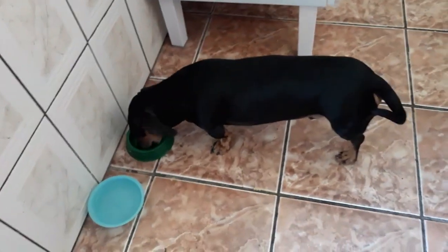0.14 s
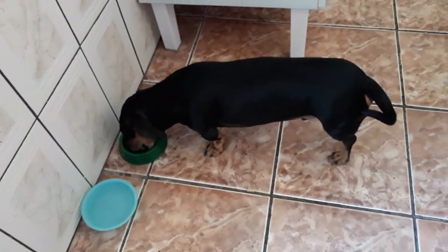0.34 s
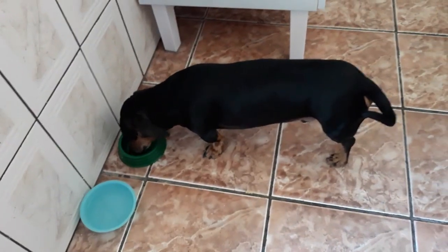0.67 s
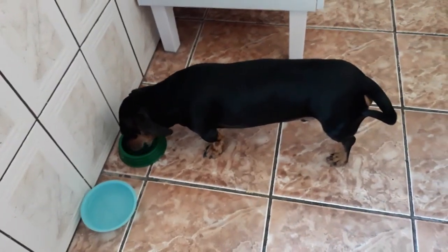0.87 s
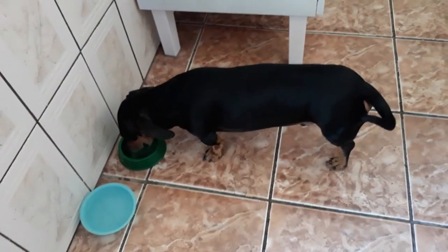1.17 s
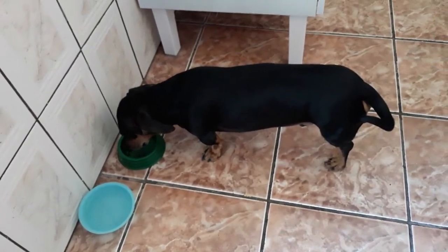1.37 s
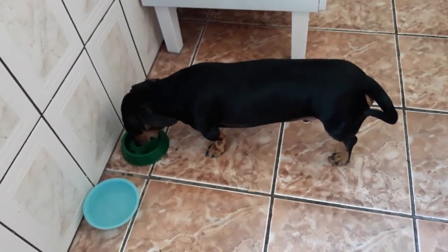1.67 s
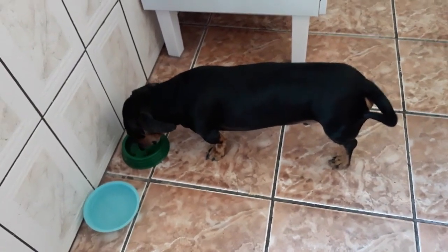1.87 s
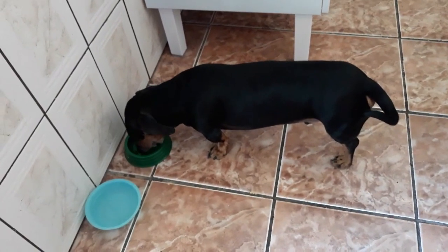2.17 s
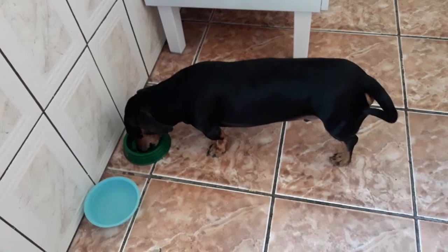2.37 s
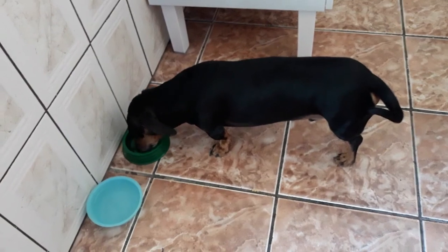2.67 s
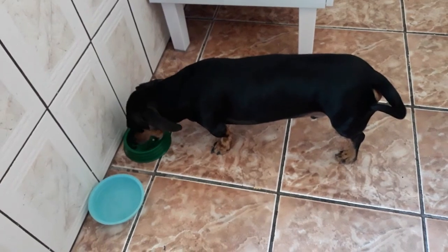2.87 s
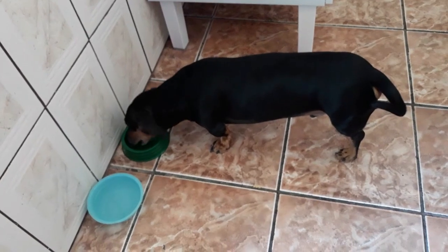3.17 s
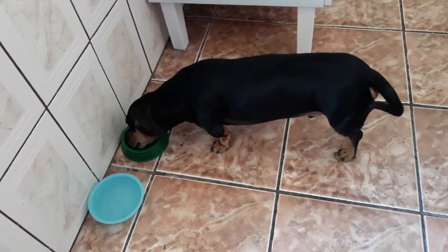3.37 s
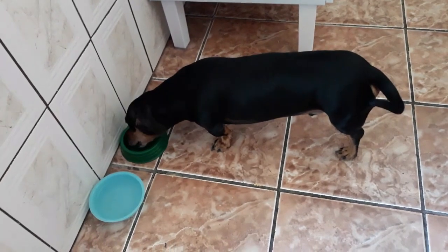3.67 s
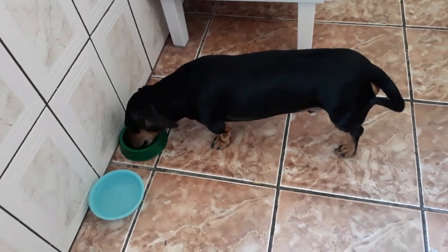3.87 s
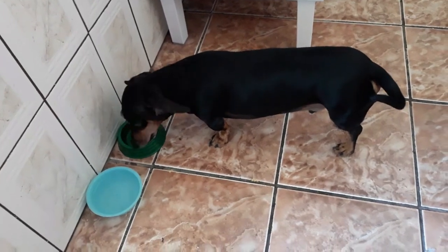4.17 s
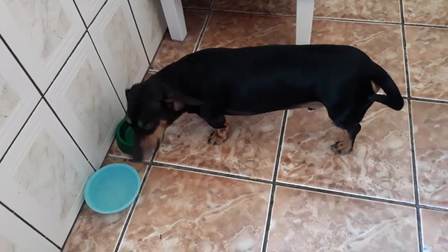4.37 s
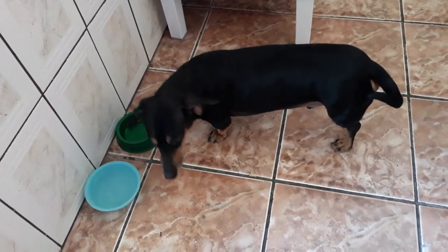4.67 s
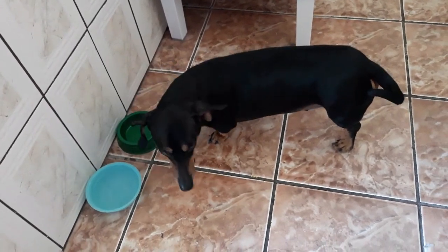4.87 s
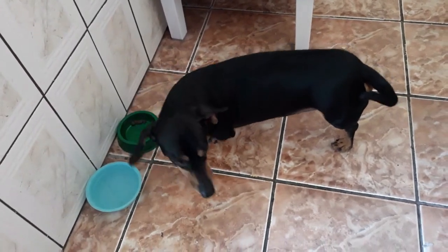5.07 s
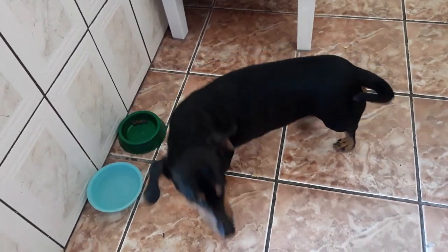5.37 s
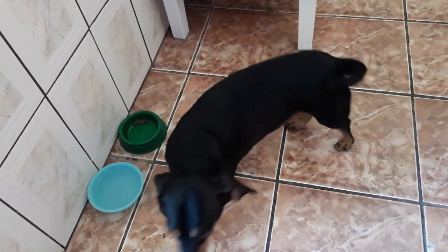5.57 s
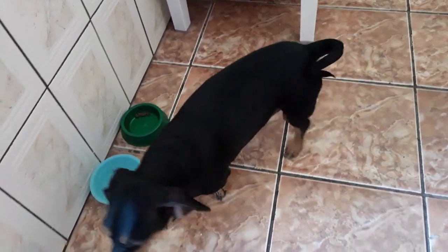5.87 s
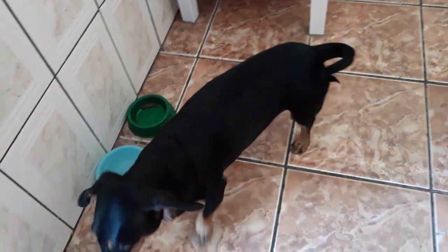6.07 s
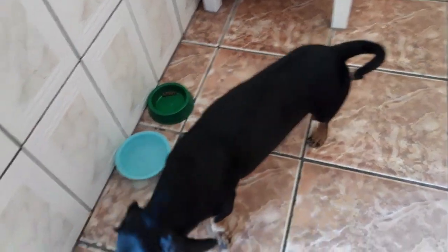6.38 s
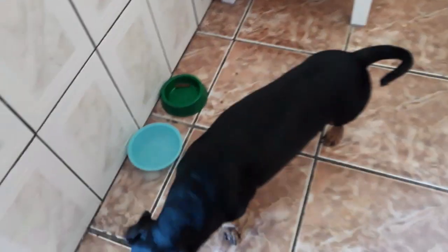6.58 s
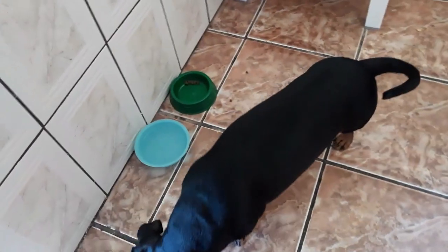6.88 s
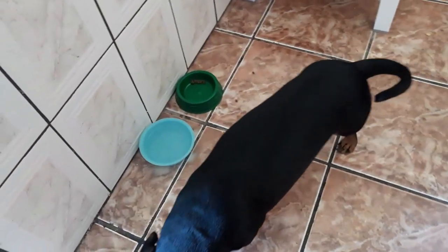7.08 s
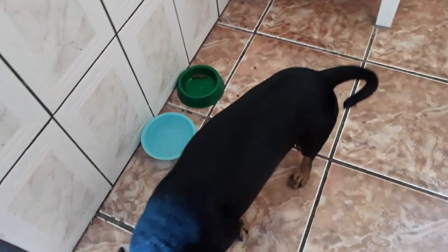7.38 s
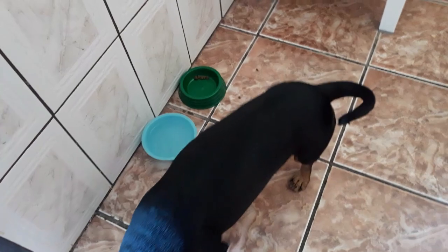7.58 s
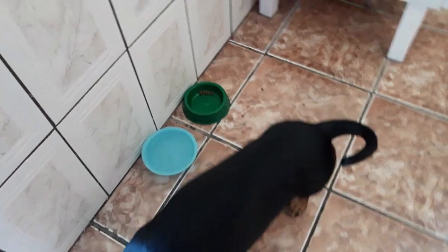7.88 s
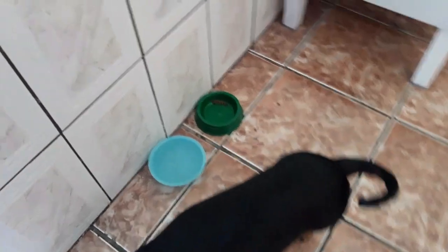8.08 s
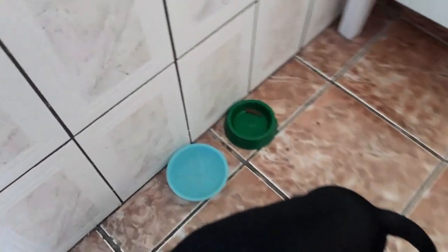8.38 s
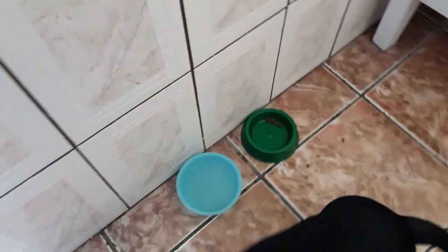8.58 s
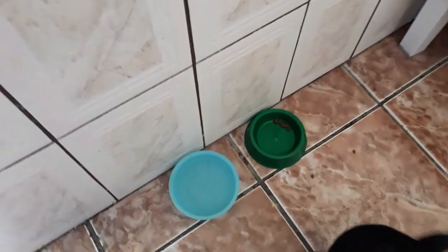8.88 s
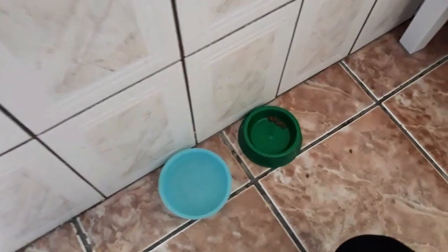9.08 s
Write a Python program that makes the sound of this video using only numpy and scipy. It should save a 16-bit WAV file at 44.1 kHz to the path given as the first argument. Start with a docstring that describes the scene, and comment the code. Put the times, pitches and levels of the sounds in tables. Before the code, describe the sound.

Hollow bowl knocks and crisp kibble and claw clicks over continuous bright running water and a low hum in an echoing tiled room.

```python
"""In a hard tiled room a small dog noses dry food around a plastic bowl.
Bowl and dishes knock as noise bursts through tuned resonances; kibble and claws click the same way, higher up.
Water splashes steadily nearby, built from thousands of bursting bubbles and a fine spray of noise.
An appliance hums low under soft room air. The tiles echo knocks, clicks and bubbles; one phone microphone hears all.
"""
import sys
import numpy as np
from scipy import signal
from scipy.fft import rfft, irfft, next_fast_len
from scipy.io import wavfile
from scipy.ndimage import uniform_filter1d, map_coordinates

SR = 44100
rng = np.random.default_rng(int(sys.argv[2]) if len(sys.argv) > 2 else 0)


def store_pcm(level_fs):
    """Save levels as 16-bit WAV."""
    pcm = np.round(np.clip(level_fs, -1, 1) * 32767).astype(np.int16)
    wavfile.write(sys.argv[1], SR, np.atleast_2d(pcm).T)


N = 407484

# samples that one blow lasts, and the frequency grid of its spectrum
SPAN = 16384
BLOW_HZ = np.fft.rfftfreq(2 * SPAN, 1 / SR)

# Knocks of bowl and dishes; the tone levels are relative to the wall of the bowl:
# start_s, peak_db (between 550 and 1100 Hz), thump_db, body_db, rim_db,
# body_ring_hz, wall_ring_hz, rim_ring_hz, t60_s (before a small fixed extension)
KNOCKS = [(0.12, -35.5, -9, -20, -9, 415, 747, 1800, 0.16),
          (0.215, -30, -23, -12.5, -12.5, 440, 795, 1530, .35),
          (0.397, -35, -4, -17, -10, 550, 990, 1770, 0.31),
          (0.445, -21.5, 13.5, -5.5, 0, 533, 720, 2360, 0.49),
          (0.459, -26.5, 8, -12, 5.5, 504, 735, 1311, 0.8), (0.684, -32.5, 2, -4.5, -14, 423, 770, 1630, 1),
          (0.93, -32, 5, 5, -15, 420, 643, 1530, 0.37), (0.954, -28.5, 0, -10, -8, 373, 930, 1650, .35),
          (1.053, -42, 7, 10, -19, 425, 640, 1670, .39), (1.165, -35, 5, -5, -7, 415, 837, 1680, 0.98),
          (1.364, -32, -5, -13, -9, 447, 762, 1860, 0.22), (1.401, -42, 6, 1, -10, 436, 1000, 2220, 0.98),
          (2.608, -29.5, 11.5, 3.5, -19, 412, 930, 1550, .51),
          (2.727, -33, -11, -11, -14, 491, 875, 1510, 0.15),
          (2.737, -19, -16, -12, -9.5, 493, 833, 1530, 0.24),
          (3.133, -36.5, 10.5, -6, 1.5, 533, 730, 2360, 0.64),
          (3.33, -30.5, 0, -10, -7, 512, 740, 1630, .4), (3.347, -29.5, 5.5, -8, -20, 516, 802, 1680, .6),
          (3.631, -34.5, -1, -3, -3, 417, 755, 2500, 0.24),
          (3.705, -30.5, -11, -11, -5, 510, 776, 1530, .26),
          (3.83, -38, -9, -20, -18, 428, 740, 1880, 0.29),
          (4.33, -32.5, 9.5, -2.5, -7, 530, 716, 1270, .28), (4.45, -50, 11, 5, 6, 420, 610, 1800, .31),
          (4.772, -43, 9, 6, 11, 417, 620, 2170, 0.27), (4.832, -43, 1, -8, 2, 428, 824, 2340, 0.24),
          (5.151, -40.5, -20, -25, 0, 423, 810, 2390, 0.24),
          (5.354, -38.5, 9.5, -4.5, -7, 357, 705, 1730, 0.23),
          (5.686, -40.5, -5, -19, -6, 549, 708, 1760, 0.21), (6.935, -33, -3, -1, -8, 554, 750, 1790, 0.22),
          (6.955, -31, -4, -8, -9, 570, 890, 1790, 0.25), (7.019, -39, 4, -6, -11, 490, 770, 1780, 0.5),
          (7.497, -33.5, 5, -16, -3.5, 455, 700, 1790, 0.34),
          (7.509, -26, 4.5, -14, -4.5, 369, 917, 1940, 0.26), (7.608, -38, 9, -11, -8, 495, 910, 1870, .32),
          (9.069, -38.5, 1, -19, -7, 495, 720, 1700, 0.43)]
# Where a knock's tone is set: thump, body, wall, rim, above the rim, treble: pitch_hz
KNOCK_HZ = [160, 420, 800, 1700, 2600, 5000]
# Modes that bowl and dishes ring with: pitch_hz, width_hz, level_db
BOWL_MODES = [(154, 18, 3), (190.6, 6.5, 2.5), (207, 40, -0.5), (367.4, 28.5, 6.5), (472, 90, 4.5),
              (592, 41, 7.5), (738, 48, 5.5), (834, 32, 6), (908, 57, 7), (1293, 35, 7.5), (1521, 31, 10.5),
              (1700, 61, 6), (1782, 27, 11.5), (1934, 110, 6), (2205, 67, -2), (2354, 56, 5),
              (2576, 30, 6.5), (2860, 62, 10), (3720, 55, -4), (4170, 130, -2), (6900, 560, -1),
              (8900, 270, 1)]
UPPER_DB, TREBLE_DB = -4, -14  # relative to the rim, at 2.6 and 5 kHz
# the softer the push, the more thump and the less direct sound (dB, dB per dB of thump)
DIRECT_DB, DIRECT_PER_THUMP = -0.4, -0.26


def knocks():
    """Bowl and dishes: each knock favours the modes near its three strongest rings; soft pushes thump more."""
    total, f = np.zeros(N), BLOW_HZ
    mode_hz, width_hz, mode_db = np.transpose(BOWL_MODES)
    signs = (-1) ** np.arange(len(mode_hz))[:, None]
    modes = peak(f, mode_hz[:, None], width_hz[:, None]) * signs
    band = (f > 550) & (f < 1100)
    for start_s, peak_db, thump_db, body_db, rim_db, *rings, t60_s in KNOCKS:
        tone_db = [thump_db, body_db, 0, rim_db, rim_db + UPPER_DB, rim_db + TREBLE_DB]
        tone = list(zip(KNOCK_HZ, tone_db))
        # up to 9 dB extra per ring for the modes close to it in pitch
        favour_db = sum(9 * np.exp(-(np.log(mode_hz / ring_hz) / 0.061) ** 2) for ring_hz in rings)
        ringing = amp(mode_db + along(tone, mode_hz) + favour_db) @ modes
        # between the modes many small resonances merge into a broad clatter
        clatter = 0.23 * amp(along(tone, f)) * peak(f, 980, 3000)
        direct = amp(DIRECT_DB + DIRECT_PER_THUMP * thump_db)
        total += struck(start_s, peak_db, t60_s, ringing + clatter, direct, 0.017, band)
    return total


# Sharp clicks of kibble and claws: start_s, peak_db, pitch_hz
CLICKS = [(0.399, -18, 3740), (0.4406, -12, 2660), (0.4471, -6, 4500), (0.453, -12, 3100),
          (0.4574, -10.5, 2900), (0.4658, -20, 2960), (0.471, -7, 4270), (0.4795, -15, 2300),
          (0.488, -13, 2970), (0.4994, -17, 4720), (0.515, -21, 2400), (1.046, -20, 3430),
          (1.797, -28, 4830), (2.301, -26, 8250), (3.068, -24, 4450), (3.4454, -24, 3810),
          (4.3046, -20, 4450), (4.772, -13, 3350), (4.813, -24, 9650), (5.014, -19, 4500),
          (5.1512, -24.5, 4100), (5.2111, -26, 4320), (5.2619, -21.5, 4790), (5.319, -30, 11000),
          (5.4242, -22, 3870), (5.844, -28, 4000), (5.928, -19.5, 4470), (6.1557, -20.5, 3980),
          (6.5068, -18, 4720), (6.706, -16, 4700), (6.938, -19, 3560), (7.664, -21, 4090), (7.7, -24, 4300),
          (7.8675, -25, 5000), (8.454, -33, 4740)]
CLICK_T60_S, FIZZ_DB = 0.2, -24.5  # base decay before the extension; gain of the fizz resonance


def clicks():
    """Small hard contacts: a broad snap, a short ring, the upper modes of the bowl and some fizz on top."""
    total, f = np.zeros(N), BLOW_HZ
    upper = np.zeros(len(f), complex)
    for k, (mode_hz, width_hz, mode_db) in enumerate(BOWL_MODES):
        if mode_hz > 2200:
            upper += (-1) ** k * amp(mode_db) * peak(f, mode_hz, width_hz)
    for start_s, peak_db, pitch_hz in CLICKS:
        ring = peak(f, pitch_hz, 570) * (1 + 1.1 * upper)
        snap = 0.29 * peak(f, 3300, 5100) ** 2
        # ring and snap fall away steeply above 9 kHz
        contact = (ring + snap) / (1 + (f / 9000) ** 6)
        fizz = amp(FIZZ_DB) * peak(f, 12500, 5000) ** 2
        total += struck(start_s, peak_db, CLICK_T60_S, contact + fizz, 0.87, 0.0051, f > 0)
    return total


def struck(start_s, peak_db, t60_s, colour, direct, early_s, band):
    """One blow: direct sound, near tiles' answers and a swelling room echo excite the struck thing's colour.

    peak_db is the peak inside band; early_s is how long the near answers last."""
    t = np.arange(SPAN) / SR
    build_up = 1 - np.exp(-t / 0.0081)
    fade_out = np.hanning(2 * SPAN)[SPAN:]
    push = echo(t60_s + 0.034, size=SPAN) * build_up * fade_out
    near = rng.standard_normal(SPAN) * np.exp(-(t / early_s) ** 2)
    push += direct * near / np.linalg.norm(near)
    push[0] += 0.67 * direct
    spectrum = rfft(push, 2 * SPAN) * colour
    top = np.abs(irfft(spectrum * band)).max()
    out, at = np.zeros(N + SR), round(start_s * SR)
    out[at:at + SPAN] = amp(peak_db) / top * irfft(spectrum)[:SPAN]
    return out[:N]


# Running water, base levels before splashes and surges (spray level counts above 6.5 kHz):
# start_s, bubbling_db, spray_db, gurgle_db
WATER = [(0.0, -40, -43, -46), (0.31, -42.5, -45, -49.5), (0.62, -37, -44, -50), (0.95, -39.5, -44, -48),
         (1.8, -42.5, -42.5, -49), (3.03, -37.5, -42.5, -49), (3.34, -37.5, -43, -45.5),
         (3.76, -39.5, -43, -48), (4.09, -37.5, -42.5, -51.5), (4.94, -35.5, -41.5, -48.5),
         (5.56, -35.5, -42.5, -62), (5.66, -38, -41.5, -54), (6.66, -36, -42, -53.5),
         (6.92, -40.5, -40.5, -50), (7.1, -42, -42, -51), (7.62, -37, -43, -56.5),
         (8.18, -38.5, -40.5, -45), (8.47, -42.5, -42.5, -51), (8.59, -40, -42, -54),
         (9.24, -38.5, -41, -43)]
# Single splashes on top of the flow, before surges: crest_s, crest_db, pitch_hz
SPLASHES = [(0.03, -40, 4000), (0.22, -35.5, 4200), (0.94, -34.5, 4300), (1.05, -44, 3900),
            (1.28, -35.5, 4020), (1.65, -37.5, 3750), (2.07, -39, 3780), (2.85, -49, 4280),
            (3.07, -37.5, 4180), (3.45, -44, 4240), (3.54, -35, 4020), (3.86, -38.5, 4400),
            (4.46, -34.5, 4120), (4.98, -42, 4300), (5.06, -40, 4100), (5.27, -40, 4120),
            (5.41, -38.5, 3650), (5.93, -41, 4760), (6.15, -41, 4000), (6.22, -35.5, 4200),
            (6.5, -39, 4200), (6.64, -33.5, 4380), (6.725, -32.5, 4680), (6.87, -37, 4330),
            (6.95, -32.5, 3720), (7.34, -39, 4500), (8.22, -34.5, 4450), (8.46, -36, 4500),
            (8.54, -33, 4200), (8.74, -43, 4300), (9.0, -41, 4650), (9.08, -41, 4400)]
# Colour of the spray: pitch_hz, level_db
SPRAY_COLOUR = [(590, -35), (1000, -13.5), (1130, -15), (1360, -13.5), (1640, -5), (2110, -5), (3050, 0),
                (4110, -3.5), (4510, -2), (8100, -4.5), (9960, -19), (14600, -16), (15600, -15)]
SPLASH_RISE_S, SPLASH_FALL_S = 0.014, 0.046
BUBBLE_HZ = 4204  # centre pitch of the bubbling between splashes
SPRAY_FOLLOWS = 0.1  # dB of spray per dB that a splash adds


def water():
    """Bright bubbling with splashes and a lower gurgle, both dry plus echo, and a fine dry spray of noise."""
    t = np.arange(N) / SR
    knots_s, *columns = np.transpose(WATER)
    flow_db, spray_db, gurgle_db = (np.interp(t, knots_s, column) for column in columns)
    # power-weighted pitch: a strong splash pulls the bubbles to its own pitch
    power = amp(flow_db) ** 2
    weighted_hz = power * BUBBLE_HZ
    for crest_s, crest_db, pitch_hz in SPLASHES:
        rise = ((crest_s - t) / SPLASH_RISE_S) ** 2
        fall = (t - crest_s) / SPLASH_FALL_S
        burst = amp(crest_db) ** 2 * np.exp(-np.where(t < crest_s, rise, fall))
        power = power + burst
        weighted_hz = weighted_hz + burst * pitch_hz
    splash_db = 10 * np.log10(power)
    surge = wobble(12)  # shared by bubbling and spray

    bubble_hz = weighted_hz / power * np.exp(0.025 * wobble(6))
    splash = drops(bubble_hz, spread=0.1305, cycles=8.3, uneven_db=2.0, count=16000)
    gurgle = drops(np.full(N, 1900), spread=0.23, cycles=2.8, uneven_db=-1.5, count=9000)
    spray = filtered(patchy(1.5), lambda f: amp(along(SPRAY_COLOUR, f)))
    spray_top = filtered(spray, lambda f: f > 6500)

    bubbling = amp(splash_db + 1.26 * surge) * wet(splash)
    gurgling = amp(gurgle_db + 0.78 * wobble(5.2)) * wet(gurgle)
    spray_gain = amp(spray_db + SPRAY_FOLLOWS * (splash_db - flow_db) + 1.06 * surge)
    return bubbling + gurgling + spray_gain * spray / np.std(spray_top)


def drops(centre_hz, spread, cycles, uneven_db, count):
    """Bursting bubbles: short damped sines with rising pitch, strewn at random."""
    draw, t = rng.random((count, 2)), np.arange(200) / SR
    start = (draw[:, 0] * N).astype(int)
    hz = (centre_hz[start] * np.exp(spread * rng.standard_normal(count)))[:, None]
    size = amp(-uneven_db * np.log(draw[:, 1:] + 0.01))
    turns = hz * t
    chirp = np.sin(2 * np.pi * turns * (1 + 0.00825 * turns))
    grain = size * np.exp(-turns / cycles) * chirp
    places = start[:, None] + np.arange(200)
    return np.bincount(places.ravel(), grain.ravel(), N + 200)[:N]


ECHO_EVERY_S = 0.3


def wet(x):
    """Dry plus echo; the water moves about, so the tiles answer each stretch differently."""
    out, step = np.pad(1.11 * x, (0, SR)), round(ECHO_EVERY_S * SR)
    for at in range(0, N, step):
        piece = signal.fftconvolve(x[at:at + step], echo(0.19, size=SR // 4))
        out[at:at + len(piece)] += piece
    return unit(out[:N])


# Decay of the tiled room relative to the source's own t60: pitch_hz, t60_ratio
TILES = [(150, 3.6), (800, 1.22), (3000, 1.24), (8000, 0.36)]


def echo(t60_s, size):
    """The tiles' answer to an impulse, energy 1: noise in which each band dies at its own speed."""
    hz, t, z = signal.stft(rng.standard_normal(size), SR, nperseg=256)
    band_t60 = t60_s * along(TILES, hz)[:, None]
    tail = signal.istft(z * amp(-60 * t / band_t60), SR, nperseg=256)[1][:size]
    return tail / np.linalg.norm(tail)


# Colour of the low room air: pitch_hz, level_db
AIR_COLOUR = [(15, -57), (25, -32), (48, -39), (81, 4), (182, -7.5), (218, 4.5), (341, -8), (446, -4),
              (479, -10.5), (849, 1.5), (1150, -8.5), (1800, -9.5), (2340, -53), (3960, -120)]
# Appliance hum, one row: pitch_hz, waver_hz, level_db (rms)
HUM = (91, 2.47, -63.5)
AIR_DB = -54.5  # rms


def room_tone():
    """Low air noise and an appliance's hum, a sine slightly unsteady in pitch and level."""
    pitch_hz, waver_hz, hum_db = HUM
    air = filtered(patchy(1.6), lambda f: amp(along(AIR_COLOUR, f)))
    phase = 2 * np.pi * np.cumsum(pitch_hz + waver_hz * wobble(5.3)) / SR
    hum = amp(4.1 * wobble(3.9)) * np.sin(phase)
    return amp(AIR_DB) * unit(air) + amp(hum_db) * unit(hum)


def patchy(depth_db):
    """White noise whose colour drifts in small patches of time and frequency."""
    z = signal.stft(rng.standard_normal(N), nperseg=512)[2]
    field = uniform_filter1d(rng.standard_normal(z.shape), size=5, axis=0)
    field = uniform_filter1d(field, size=8, axis=1)
    return signal.istft(z * amp(depth_db * unit(field)), nperseg=512)[1][:N]


def amp(db):
    """dB to gain."""
    return 10 ** (np.asarray(db) / 20)


def unit(x):
    """Scaled to rms 1."""
    return x / np.sqrt(np.mean(x ** 2) + 1e-20)


def along(points, hz):
    """Value at hz between (Hz, value) points, on a log frequency axis."""
    f, v = np.transpose(points)
    return np.interp(np.log(hz + 1), np.log(f + 1), v)


def wobble(rate):
    """A smooth random curve, rate knots a second."""
    knots = rng.standard_normal(int(N * rate / SR) + 4)
    return map_coordinates(knots, [np.arange(N) * rate / SR])


def filtered(x, response):
    """The sound x shaped by a complex response of frequency."""
    m = next_fast_len(len(x) + SR // 4)
    return irfft(rfft(x, m) * response(np.fft.rfftfreq(m, 1 / SR)), m)[:len(x)]


def peak(f, hz, width):
    """One causal resonance, gain 1 at its centre."""
    return 1j * f * width / (hz * hz - f * f + 1j * f * width)


def scene():
    """All sources at one microphone, which feeds both channels."""
    mono = knocks() + clicks() + water() + room_tone()
    return np.array([mono, mono])


TOP_HZ = 15550


def record(dry):
    """The phone cuts the deep bass below about 42 Hz and keeps nothing above its band limit."""
    sound = filtered(dry[0], lambda f: (f < TOP_HZ) * (1j * f / (42 + 1j * f)) ** 3)
    return np.array([sound, sound])


dry = scene()
out = record(dry)
store_pcm(out)
```